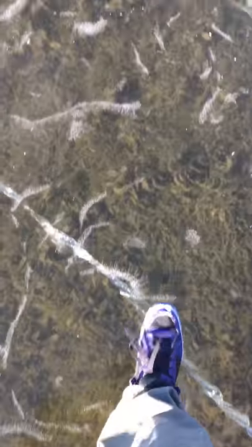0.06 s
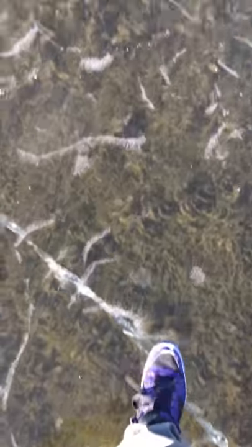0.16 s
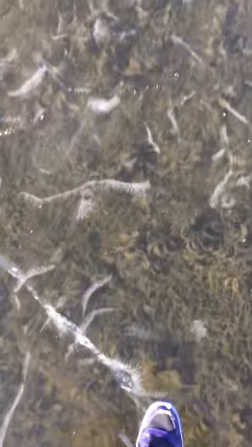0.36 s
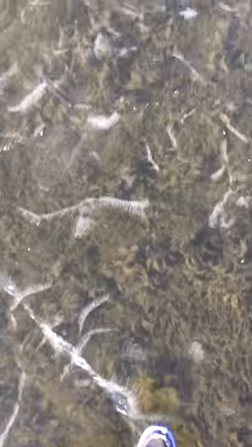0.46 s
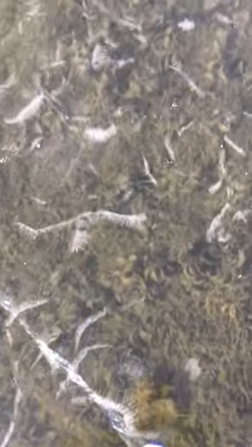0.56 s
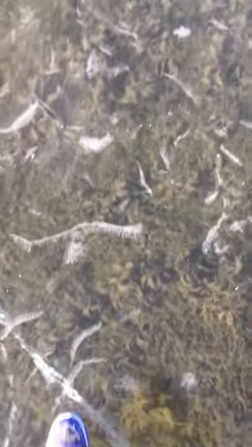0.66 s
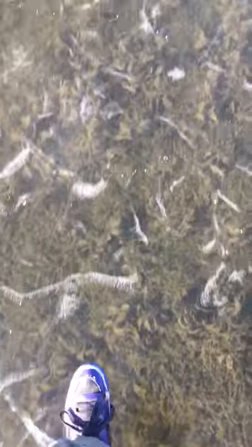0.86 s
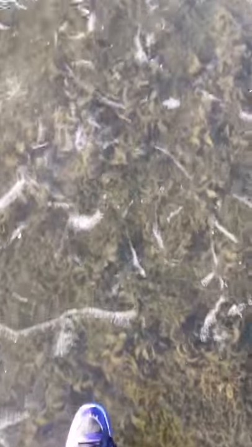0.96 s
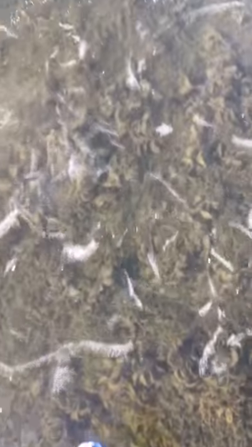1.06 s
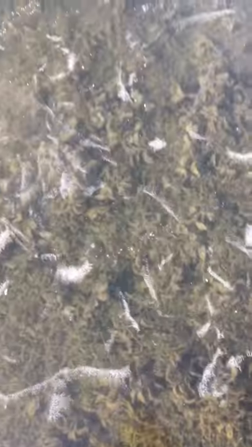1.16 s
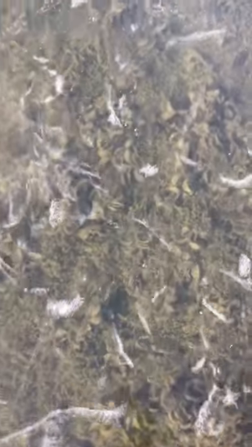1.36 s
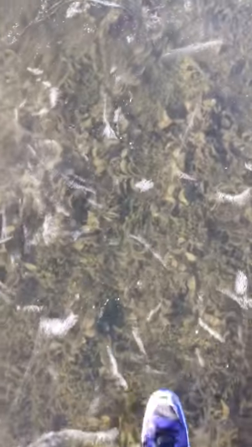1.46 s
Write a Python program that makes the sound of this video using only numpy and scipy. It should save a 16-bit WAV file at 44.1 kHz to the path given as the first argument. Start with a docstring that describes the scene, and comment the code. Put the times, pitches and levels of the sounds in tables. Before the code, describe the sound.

Thin ice cracks under two footsteps, heard close up. At about 0.2 seconds the first step lands with a dull thud and faint rubber squeak, setting off tiny bright cracks and short falling knocks until 0.4. Soles and trousers brush softly near 0.7. The second step cracks and knocks from 0.8 to 1.1, followed by stray ticks and a last scuff. Light wind rumble and faint hiss continue throughout.

```python
"""Two steps on thin lake ice, heard from a phone in the walker's hand.
Light wind rumbles on the microphone over a faint outdoor hiss throughout. At 0.2 s the first step lands
with a dull thud and a faint rubber squeak; the ice gives a cluster of tiny bright cracks and the sheet
answers with short falling knocks. Soles scuff and trousers swish around 0.7 s. The second step cracks
and knocks from 0.8 to 1.1 s; a few stray cracks and a last scuff follow."""
import sys
import numpy as np
from scipy import signal
from scipy.fft import rfft, irfft
from scipy.io import wavfile

SR = 44100
rng = np.random.default_rng(int(sys.argv[2]) if len(sys.argv) > 2 else 0)


def unload_wav(signal):
    """Save mono or channel-first audio to the path in sys.argv[1] as 16-bit WAV at rate SR, clipped to [-1, 1]."""
    wavfile.write(
        sys.argv[1],
        SR,
        np.round(np.clip(np.atleast_2d(signal).T, -1, 1) * 32767).astype(np.int16),
    )


N = 66150


def undb(db):
    """Decibels to amplitude."""
    return 10 ** (np.asarray(db) / 20)


def unit_energy(x):
    """Scale to an energy of 1."""
    return x / np.sqrt(np.sum(x ** 2) + 1e-18)


def add(out, start_s, x):
    """Mix x into out from start_s."""
    i = max(int(start_s * SR), 0)
    out[i:i + len(x)] += x[:len(out) - i]


def colour(points, size):
    """Gain per FFT bin from (Hz, dB) points."""
    hz, db = np.array(points, float).T
    return undb(np.interp(np.log(np.fft.rfftfreq(size, 1 / SR) + 1), np.log(hz), db))


def noise(gain):
    """Noise of rms 1 with the given spectral shape."""
    return unit_energy(irfft(rfft(rng.standard_normal(N)) * gain, N)) * np.sqrt(N)


def wander(rate_hz):
    """Smooth random wander, spread near 1."""
    knots = rng.standard_normal(N)
    return np.interp(np.arange(N) * rate_hz / SR, np.arange(N), knots)


def min_phase_pulse(gain):
    """The shortest causal pulse with this spectrum, energy 1."""
    cepstrum = irfft(np.log(gain / gain.max() + undb(-70)))
    half = len(cepstrum) // 2
    cepstrum[1:half] *= 2
    cepstrum[half + 1:] = 0
    return unit_energy(irfft(np.exp(rfft(cepstrum))))


def burst(decay_s, size):
    """Exponentially decaying noise, energy 1."""
    return unit_energy(rng.standard_normal(size) * np.exp(-np.arange(size) / SR / decay_s))


# Hiss spectrum. Each row: frequency in Hz, relative level in dB.
HISS_SPECTRUM = [(100, -8), (350, 0), (600, -3), (1100, -2), (2200, -6.5), (4800, -15.5), (9000, -16),
                 (16500, -13), (17500, -44), (19000, -58)]
# Hiss envelope. Each row: time in seconds, level in dB.
HISS_LEVELS = [(0, -59), (.4, -56), (.5, -59), (.62, -57.5), (.78, -58), (.93, -59.5), (1.08, -57.5),
               (1.35, -59.5), (1.5, -59)]


def hiss(t):
    """Distant outdoor hiss; the level flickers slightly."""
    level_db = np.interp(t, *np.array(HISS_LEVELS).T)
    return noise(colour(HISS_SPECTRUM, N)) * undb(level_db + 0.8152 * wander(rate_hz=15.94))


# Rumble spectrum. Each row: frequency in Hz, relative level in dB.
RUMBLE_SPECTRUM = [(50, -11.5), (90, -4.5), (130, 0), (200, -0.5), (260, -9), (340, -15.5), (600, -24),
                   (1500, -48.5)]


def rumble(level_db=-53):
    """Steady low outdoor rumble."""
    return noise(colour(RUMBLE_SPECTRUM, N)) * undb(level_db)


# Wind spectrum. Each row: frequency in Hz, relative level in dB.
WIND_SPECTRUM = [(15, -33), (30, -13.5), (45, -11), (62, -1.5), (85, -10), (120, -13), (250, -47.5),
                 (600, -50.5)]
# Gust envelope. Each row: time in seconds, level in dB.
WIND_LEVELS = [(0, -52), (.124, -46.5), (.254, -51), (.37, -48), (.442, -49.5), (.5, -48.5), (.568, -45.5),
               (.614, -52.5), (.76, -47.5), (.818, -47), (.93, -57), (1.0, -49), (1.048, -53),
               (1.144, -59.5), (1.35, -57.5), (1.474, -51), (1.5, -54.5)]


def wind(t):
    """Light gusts buffet the microphone."""
    level_db = np.interp(t, *np.array(WIND_LEVELS).T)
    return noise(colour(WIND_SPECTRUM, N)) * undb(level_db)


# Sole scuffs and cloth swishes. Each row: peak time in seconds, half length in seconds, level in dB,
# band centre in Hz, band spread in octaves.
FRICTION_STROKES = [(0.014, 0.0273, -61.5, 2625, 0.495), (0.213, 0.0079, -51.5, 2774, 0.233),
                    (0.207, 0.0108, -52.5, 1500, 0.34), (0.697, 0.0169, -55, 815, 0.664),
                    (0.728, 0.0443, -60, 2350, 0.98), (0.743, 0.0444, -59.5, 13000, 0.68),
                    (1.064, 0.0267, -60, 3300, 2.6), (1.224, 0.0186, -58.5, 1570, 0.845),
                    (1.47, 0.0177, -52.5, 2674, 0.416), (1.463, 0.0476, -56.5, 1016, 1.07),
                    (1.463, 0.034, -63.5, 9600, 1.12)]
FRICTION_GRAIN_DB = 3


def rubs(t):
    """Grainy friction of soles and trousers swells and fades with each movement."""
    out, bin_hz = np.zeros(N), np.fft.rfftfreq(N, 1 / SR) + 1
    for peak_s, half_s, db, centre_hz, spread_oct in FRICTION_STROKES:
        band = np.exp(-.5 * (np.log2(bin_hz / centre_hz) / spread_oct) ** 2)
        band /= 1 + (bin_hz / 17000) ** 40
        swell = np.exp(-.5 * ((t - peak_s) / half_s) ** 2)
        out += noise(band) * undb(db + FRICTION_GRAIN_DB * wander(rate_hz=400)) * swell
    return out


def squeak(t, peak_s=.204, half_s=0.0093, level_db=-55.5):
    """Stick-slip of a rubber sole twisting on ice: an unsteady tone that sags as the sole slows."""
    pitch_hz, sag_hz_per_s, jitter_hz = 3300, 4000, 190.4
    hz = pitch_hz - sag_hz_per_s * (t - peak_s) + jitter_hz * wander(rate_hz=700)
    gain = undb(level_db + FRICTION_GRAIN_DB * wander(rate_hz=401))
    swell = np.exp(-.5 * ((t - peak_s) / half_s) ** 2)
    return gain * swell * np.sin(2 * np.pi * np.cumsum(hz) / SR)


# Thuds. Each row: peak time in seconds, peak level in dB, pitch in Hz, half length in seconds.
WEIGHT_THUDS = [(0.123, -47.5, 65, 0.022), (0.16, -38, 60, 0.0092), (.196, -37, 110, 0.00412),
                (0.386, -40.5, 61.7, 0.0274), (0.854, -38.5, 49.4, 0.0218), (0.973, -32.5, 64.3, 0.0096),
                (.968, -42, 161.7, 0.00575), (1.025, -38, 206.8, 0.00466), (1.052, -49, 65, 0.015)]


def thuds(t):
    """A cycle or two of deep bass as the walker's weight shifts."""
    out = np.zeros(N)
    for peak_s, db, hz, half_s in WEIGHT_THUDS:
        swell = np.exp(-((t - peak_s) / half_s) ** 2)
        out += undb(db) * swell * np.cos(2 * np.pi * hz * (t - peak_s))
    return out


# Ice sheet knocks. Each row: start in seconds, energy in dB, first pitch in Hz, last pitch in Hz,
# decay in ms.
SHEET_KNOCKS = [(.175, -26, 1983, 590, 1.88), (.191, -26.5, 870, 547, 5), (.2192, -17.5, 2050, 406.4, 2.8),
                (.2610, -22.5, 1032, 686, 8), (.2620, -16, 554, 456, 1.64), (.3220, -16, 568, 517.6, 3.62),
                (0.3689, -25.5, 1082, 478.6, 4.9), (.377, -34.5, 1420, 600, 3),
                (.3990, -19, 1067, 571.6, 3.8), (.620, -29.5, 996, 816.5, 5.4), (.8228, -29, 800, 540, 4.5),
                (.882, -25.5, 803, 542, 3.43), (.987, -27.5, 1290, 590, 1.14),
                (1.0221, -12, 2285, 915, 0.365), (1.0226, -16, 942, 456, 1.31),
                (1.026, -15.5, 1790, 680, 0.43), (1.0275, -13.5, 552, 487.7, 4.7),
                (1.434, -27.5, 1290, 1042, 2.9)]


def knocks(size=2048, glide_s=0.001101, rise_share=0.109):
    """Bending waves in the sheet: the high part arrives first, so each knock falls in pitch."""
    out, t = np.zeros(N), np.arange(size) / SR
    for start_s, db, first_hz, last_hz, decay_ms in SHEET_KNOCKS:
        hz = last_hz + (first_hz - last_hz) * np.exp(-t / glide_s)
        age = t * 1000 / decay_ms
        envelope = np.exp(-age) * (1 - np.exp(-age / rise_share))
        tone = np.sin(2 * np.pi * np.cumsum(hz) / SR)
        add(out, start_s, undb(db) * unit_energy(envelope * tone))
    return out


# Spectrum of a crack's broad snap. Each row: frequency in Hz, relative level in dB.
SNAP_SPECTRUM = [(200, -22.5), (700, -1), (1500, -11.5), (3000, 2), (4800, -7.5), (7500, -2), (12000, 3),
                 (16000, -3), (19000, -10)]
# Ice fractures. Each row: start in seconds, direct energy in dB, ping pitch in Hz, nominal ping width
# in Hz, snap relative to ping in dB, splinter decay in ms.
ICE_CRACKS = [(.1892, -32, 14000, 5000, 0, 0.5), (0.219, -5, 15410, 3500, -5, 0.87),
              (0.2519, -16, 16200, 2000, -17.5, .1), (0.2607, 0.5, 13920, 1900, -13, 0.11),
              (0.2608, -3, 8334, 1000, -2, 0.227), (0.2619, -4, 8920, 900, 0, 0.294),
              (0.261, -18.5, 2030, 260, -16.5, .1), (0.2747, -20, 15400, 2500, 1, 0.86),
              (0.2983, -28.5, 13000, 5000, -15, 1.2), (0.3127, -16, 13500, 5000, -9, 0.37),
              (0.3171, -9, 13020, 4530, -11.5, 0.12), (0.3208, -2, 15700, 1800, -15.5, 0.173),
              (0.3226, -3, 15150, 2020, -14, 0.118), (0.3225, -27.5, 5460, 400, -20.5, 0.165),
              (0.3210, -24, 3158, 300, -20, .1), (0.3315, -20.5, 12300, 2000, -6.5, 0.46),
              (0.3513, -14, 15400, 2000, -6, 0.285), (0.3511, -35, 3200, 450, -11.5, 0.23),
              (0.3639, -25.5, 14500, 5000, -12, 0.61), (0.3685, -5.5, 14600, 2300, -17, 0.154),
              (0.3684, -16.5, 8900, 1110, -25, 0.081), (0.377, -9.5, 16100, 2200, -11.5, 0.61),
              (0.398, -24.5, 14000, 5000, -4, 1.54), (0.4039, -23, 13500, 4500, -4, .5),
              (0.8226, -12.5, 11760, 6500, -9, 0.014), (0.8226, -22.5, 6780, 900, -4.5, 0.097),
              (0.8819, -20.5, 13240, 2500, -13.5, 0.24), (0.8822, -31.5, 6770, 700, -7.5, .3),
              (1.0184, -28.5, 14000, 5000, -7.5, .1), (1.0257, -2.5, 13160, 2800, -8.5, 0.083),
              (1.0259, -8.5, 8150, 1000, -12, .1), (1.0266, -14.5, 7820, 2500, -8, 0.107),
              (1.027, -3.5, 13640, 4200, -8, 0.059), (1.0392, -28.5, 13000, 5000, -2, .2),
              (1.0477, -8.5, 13140, 2010, -10, 0.21), (1.0478, -17, 4350, 3400, -13.5, 0.059),
              (1.0639, -18.5, 10200, 4000, -3, 0.087), (1.1168, -26, 10500, 4500, 2, 0.174),
              (1.1712, -33, 4170, 3000, -7, 0.21), (1.2578, -20, 14800, 2440, -17, 0.039),
              (1.435, -34, 2480, 2980, -12, 0.28)]
SPLINTER_DB = 4.5
BODY_ECHO_S, BODY_ECHO_DB, BODY_SMEAR_S = 0.0016, -12.5, 0.00045
SCATTER_DB, SCATTER_DECAY_S = -15.5, 0.00655


def cracks(size=2048):
    """Each fracture pings and snaps, splinters, echoes off the walker and scatters over the ice."""
    out, bin_hz = np.zeros(N), np.fft.rfftfreq(size, 1 / SR)
    snap = unit_energy(colour(SNAP_SPECTRUM, size))
    for start_s, db, ping_hz, width_hz, snap_db, splinter_ms in ICE_CRACKS:
        low_cut = bin_hz / np.hypot(bin_hz, ping_hz)
        ping = unit_energy(low_cut / (1 + ((bin_hz - ping_hz) / (1.023 * width_hz)) ** 2))
        pulse = min_phase_pulse(np.hypot(ping, undb(snap_db) * snap))
        fracture = undb(SPLINTER_DB) * burst(splinter_ms / 1000, size)
        fracture[0] += 1  # initial break
        direct = unit_energy(signal.fftconvolve(pulse, fracture))
        echo = unit_energy(signal.fftconvolve(pulse, burst(BODY_SMEAR_S, size)))
        scatter = unit_energy(signal.fftconvolve(pulse, burst(SCATTER_DECAY_S, size)))
        add(out, start_s, undb(db) * direct)
        add(out, start_s + BODY_ECHO_S, undb(db + BODY_ECHO_DB) * echo)
        add(out, start_s, undb(db + SCATTER_DB) * scatter)
    return out


def scene():
    """Ice, walker and outdoor air in one channel."""
    t = np.arange(N) / SR
    ice = cracks() + knocks()
    walker = thuds(t) + rubs(t) + squeak(t)
    outdoors = wind(t) + rumble() + hiss(t)
    return (ice + walker + outdoors)[None]


def record(dry):
    """The phone's microphone rolls off the highest treble, and the very top is cut."""
    roll_off_hz, cut_hz = 17500, 19800
    soft = signal.sosfilt(signal.butter(5, roll_off_hz, fs=SR, output="sos"), dry)
    return signal.sosfilt(signal.ellip(8, .2, 80, cut_hz, fs=SR, output="sos"), soft)


dry = scene()
out = record(dry)
unload_wav(out)
```